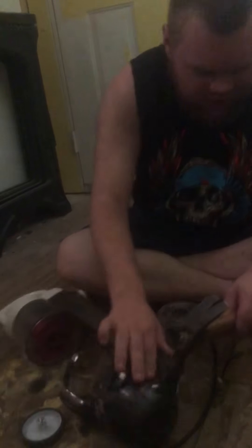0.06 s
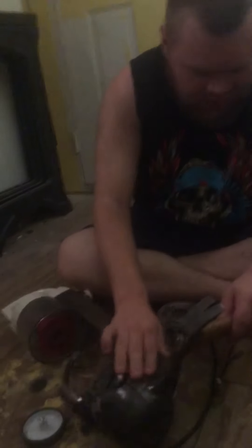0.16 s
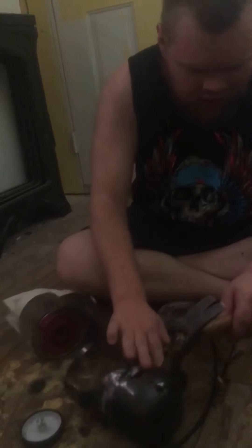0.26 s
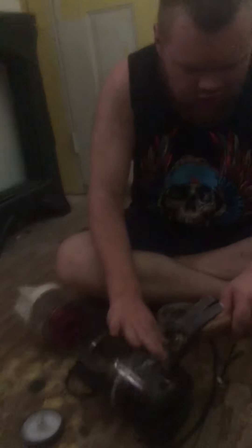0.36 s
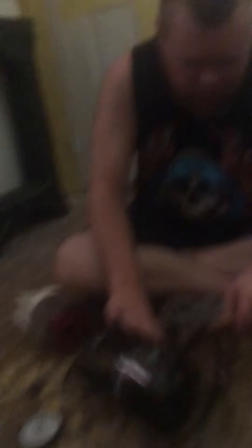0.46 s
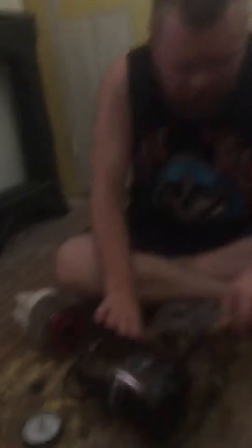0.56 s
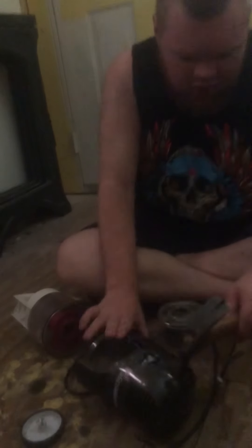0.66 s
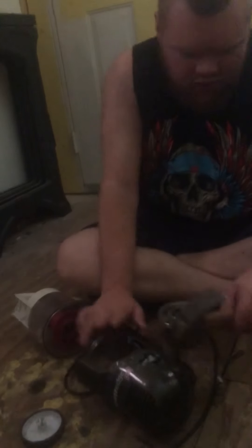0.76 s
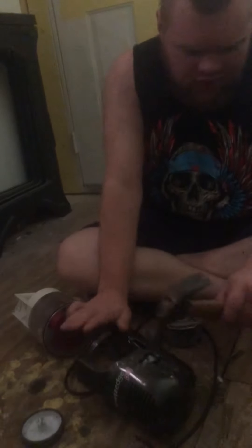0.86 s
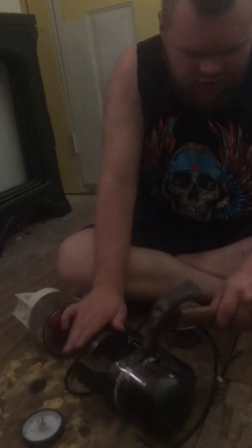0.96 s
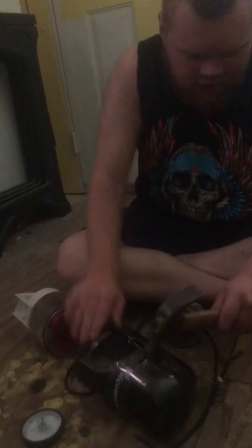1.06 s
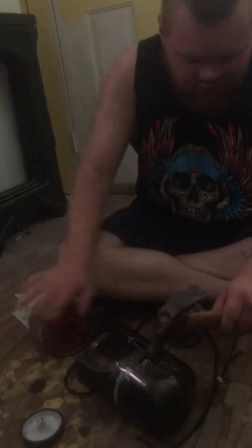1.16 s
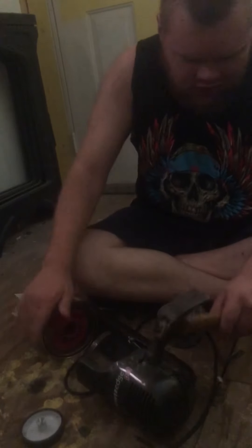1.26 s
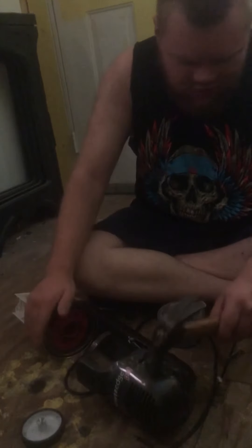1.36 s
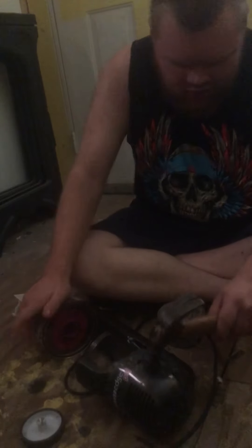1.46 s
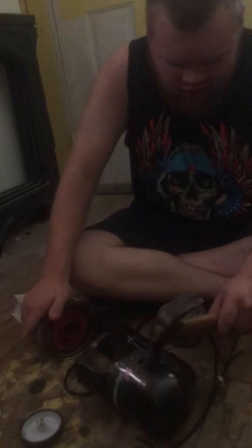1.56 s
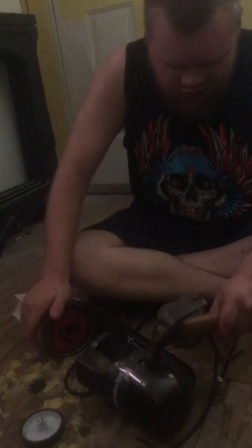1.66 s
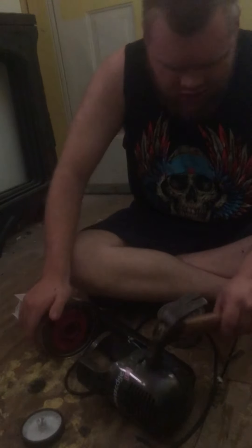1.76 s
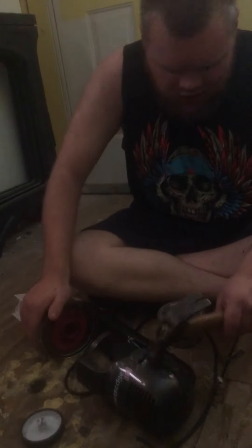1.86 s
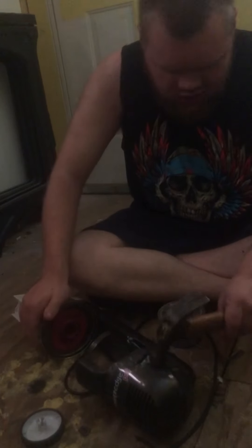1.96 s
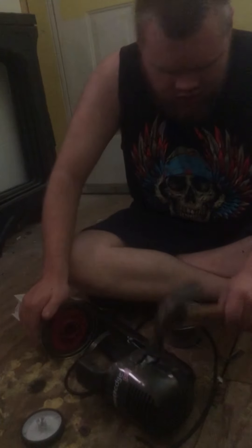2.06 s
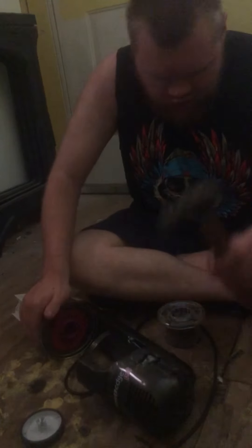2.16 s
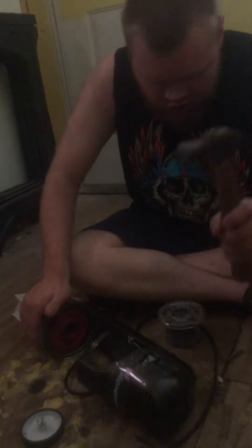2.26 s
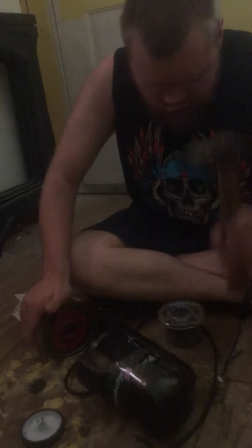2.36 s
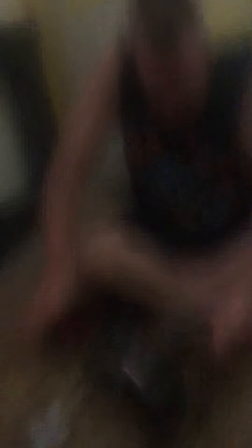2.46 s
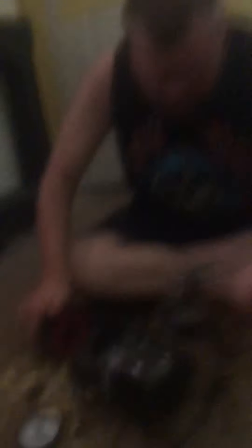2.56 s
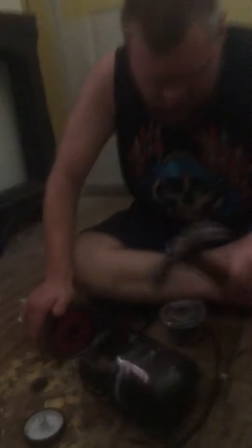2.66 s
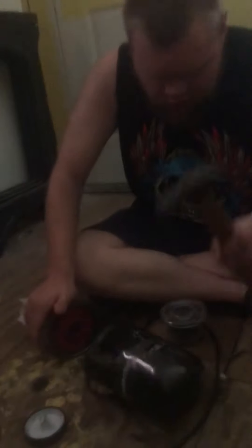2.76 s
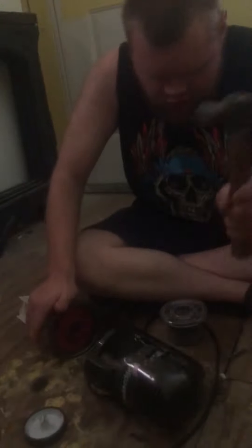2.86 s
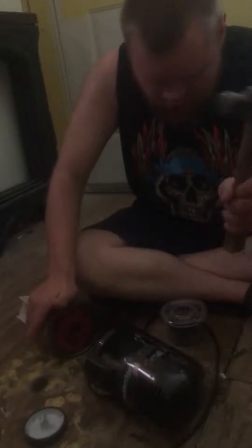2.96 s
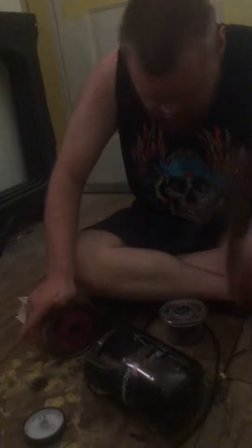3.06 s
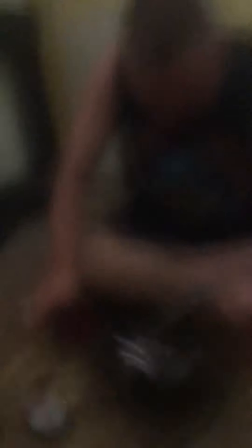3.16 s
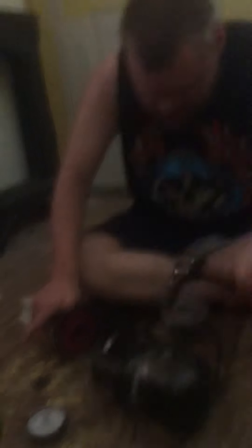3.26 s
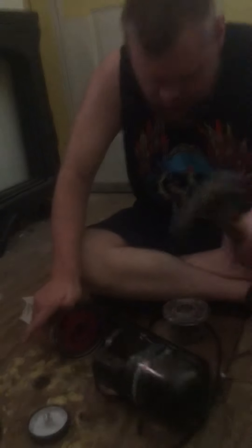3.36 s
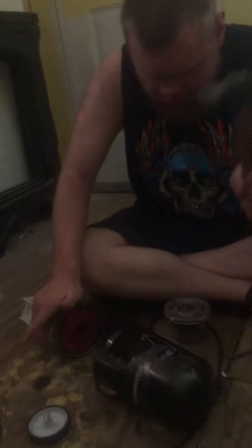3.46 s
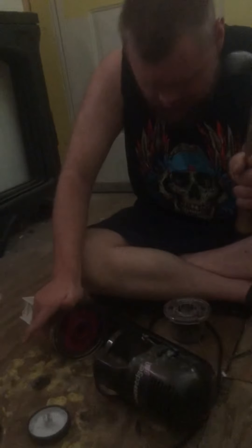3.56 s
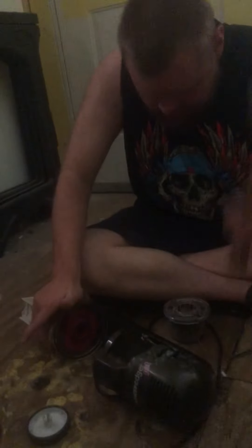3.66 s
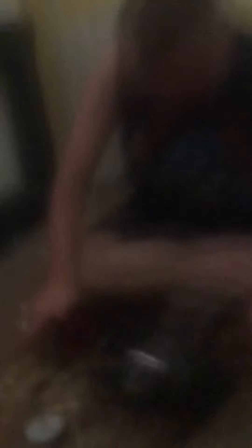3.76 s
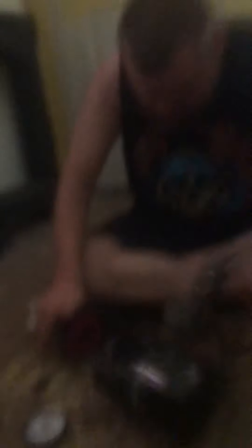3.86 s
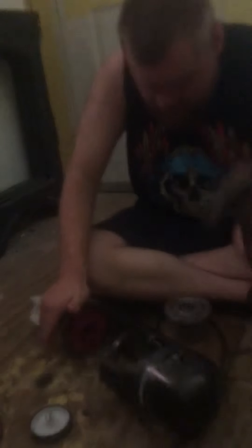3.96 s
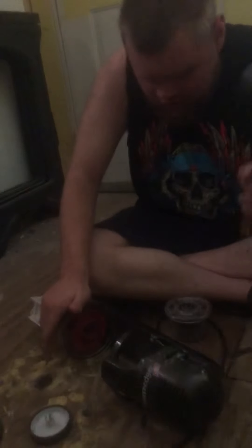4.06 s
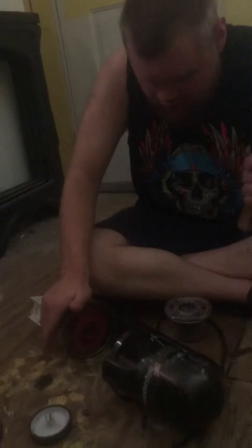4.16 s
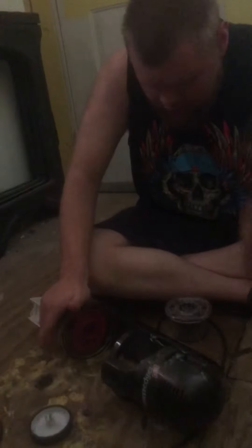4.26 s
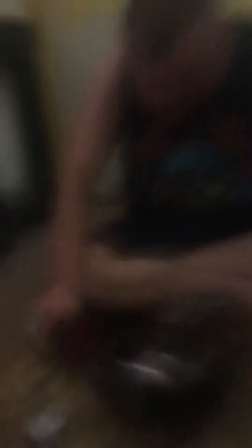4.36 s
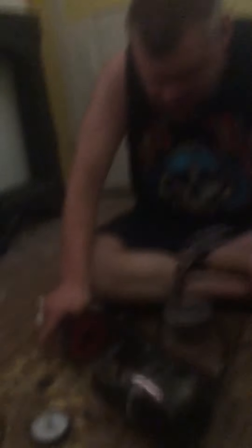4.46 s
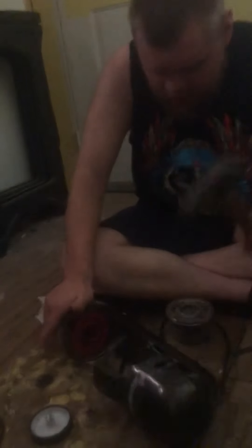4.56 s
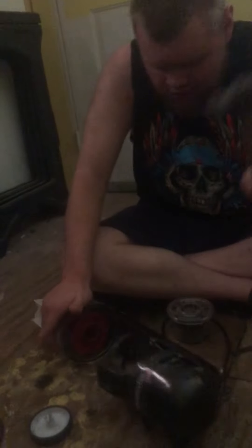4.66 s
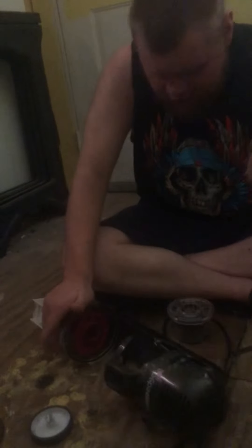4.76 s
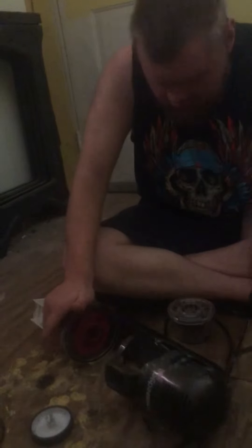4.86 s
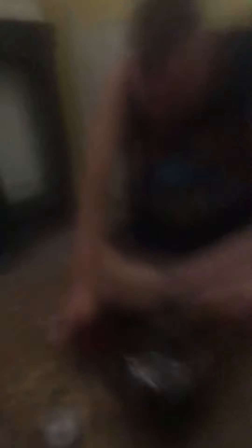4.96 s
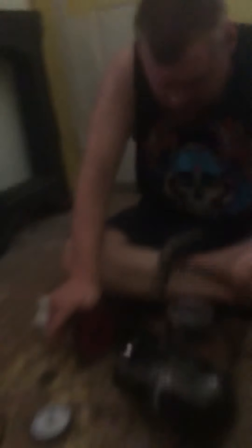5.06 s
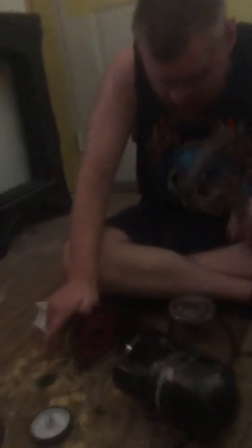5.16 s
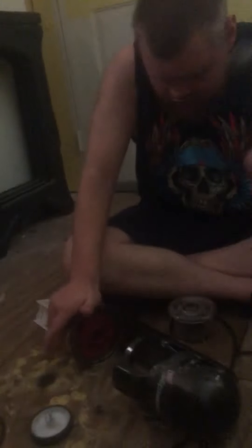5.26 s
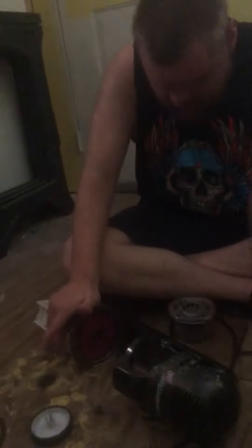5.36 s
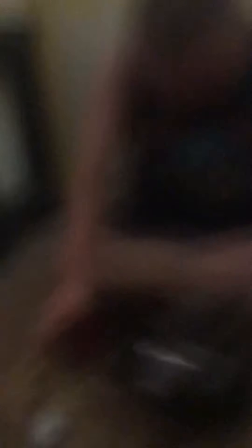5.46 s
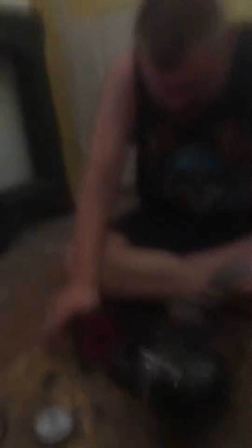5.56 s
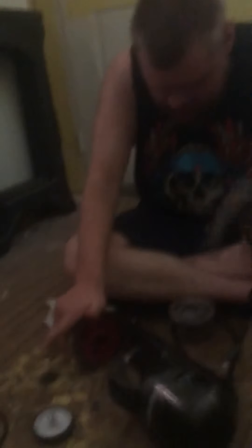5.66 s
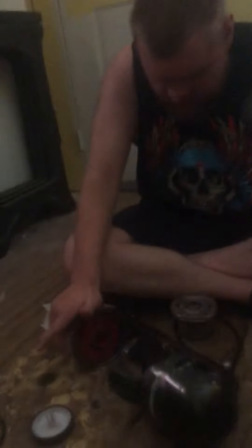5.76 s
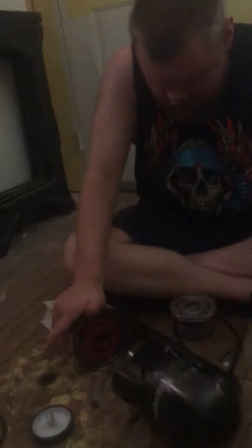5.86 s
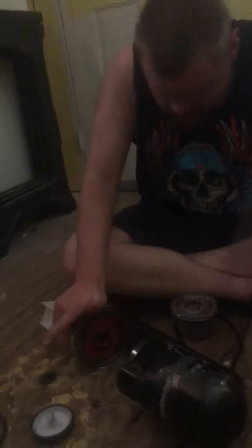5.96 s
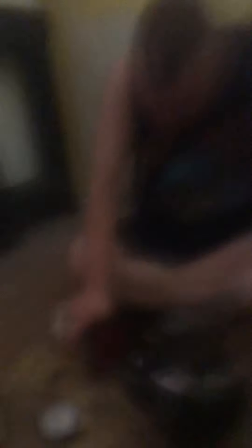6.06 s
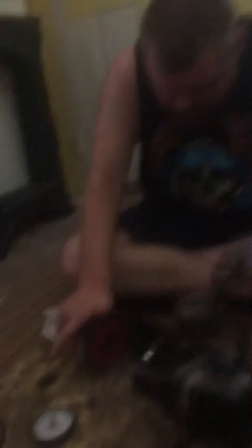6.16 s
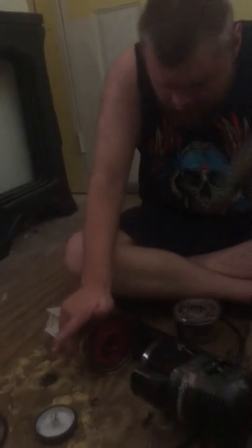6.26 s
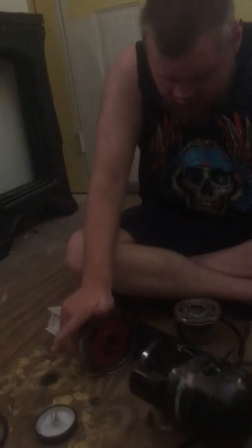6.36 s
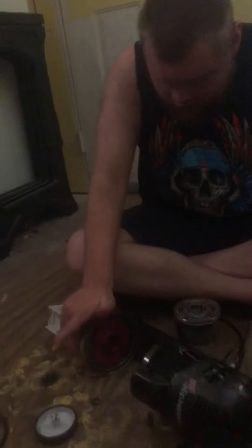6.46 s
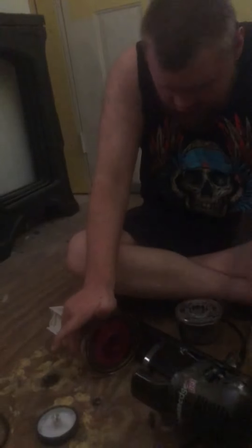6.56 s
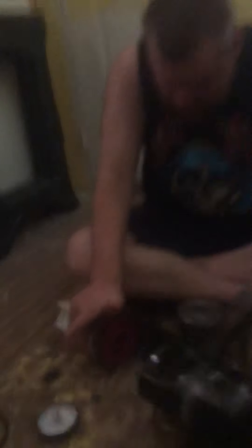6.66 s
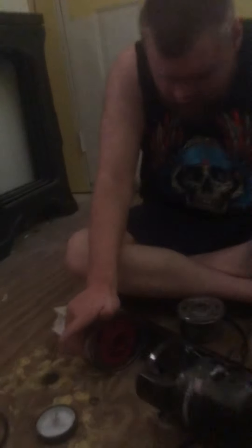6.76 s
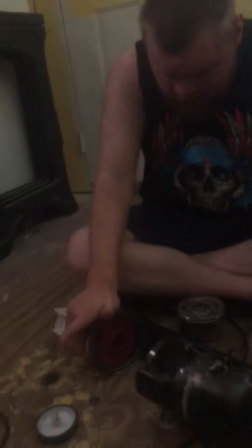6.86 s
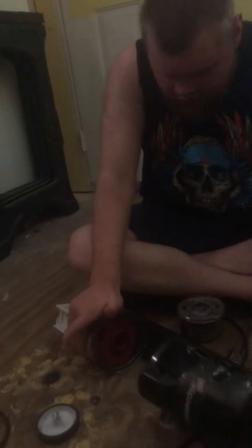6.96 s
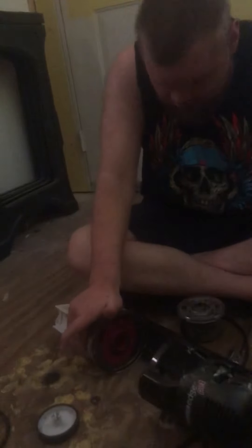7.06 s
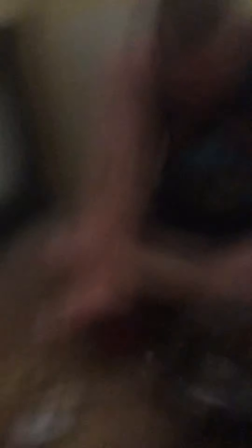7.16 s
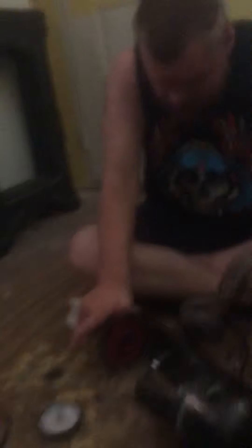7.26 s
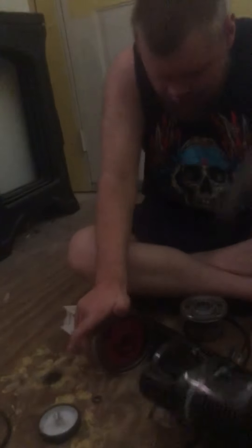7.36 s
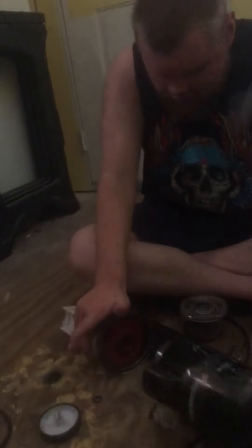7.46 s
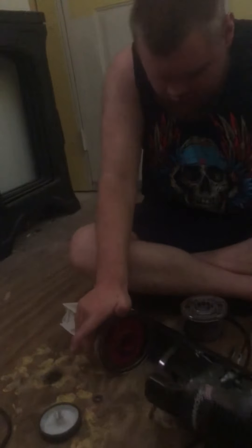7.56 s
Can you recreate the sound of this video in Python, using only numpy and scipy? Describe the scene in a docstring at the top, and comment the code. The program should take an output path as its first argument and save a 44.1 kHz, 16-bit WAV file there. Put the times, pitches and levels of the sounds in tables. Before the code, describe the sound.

A faint motor hum with a thin whirr runs throughout in a small room. During the first second, a plastic appliance is rolled over on a wooden floor, making soft, uneven thuds and a few clacks. After a lull, a hammer hits it at about 2.4 seconds and keeps going, nine loud, close blows roughly 0.6 seconds apart, the last at about 7.1 seconds. Each is a sharp plastic crack with a hollow knock, a quick rebound and a low boom in the boards, dying fast in the room. Chips and splinters tick down between blows, more noticeably from 5.5 seconds, and the housing rocks lightly, its hollow tone dropping as it splits. Small metal parts give tiny high tinkles around 6.5 and 7.5 seconds. The loosened housing scrapes briefly over grit at 7.0 seconds and again, louder, near 7.4.

```python
"""A motor hums in a small room. A plastic appliance is rolled over and bumps on the wooden floor.
From 2.4 s a hammer strikes it nine times: each blow cracks in the shell, booms in the boards and
shakes loose chips. A compressor flattens the blows; the gain control stays down after the first.
Around the last blows small metal parts tinkle and the loosened housing skids twice."""
import sys
import numpy as np
from scipy import signal
from scipy.fft import rfft, irfft, next_fast_len
from scipy.io import wavfile
from scipy.ndimage import uniform_filter1d, map_coordinates

SR = 44100
rng = np.random.default_rng(int(sys.argv[2]) if len(sys.argv) > 2 else 0)


def generate_wav(signal):
    """Clip the signal to [-1, 1] and save it as 16-bit WAV at the path in sys.argv[1]."""
    frames = np.transpose(np.atleast_2d(signal))
    scaled = np.clip(frames, -1, 1) * 32767
    pcm = np.round(scaled).astype(np.int16)
    wavfile.write(sys.argv[1], SR, pcm)


N = 334754
T = np.arange(int(.55 * SR)) / SR  # time axis of one event [s]


def amp(db):
    """Decibels to gain."""
    return 10 ** (np.asarray(db) / 20)


def unit(x):
    """Scaled to rms 1."""
    return x / np.sqrt(np.mean(x ** 2) + 1e-20)


def along(points, hz):
    """Interpolates (frequency [Hz], value) points on a log axis."""
    points_hz, values = np.transpose(points)
    return np.interp(np.log(hz + 1), np.log(points_hz), values)


def fade(t, t60_s):
    """Falls 60 dB in t60_s."""
    return np.exp(-np.log(1000) * t / t60_s)


def filtered(x, response):
    """Applies a complex frequency response."""
    size = next_fast_len(len(x) + SR // 10)
    return irfft(rfft(x, size) * response(np.fft.rfftfreq(size, 1 / SR)), size)[:len(x)]


def resonances(modes, f):
    """Response of (frequency [Hz], width [Hz], level [dB]) modes."""
    return sum(amp(db) * 1j * f * width / (hz * hz - f * f + 1j * f * width) for hz, width, db in modes)


def noise(spectrum, size):
    """Coloured noise, rms 1."""
    return unit(filtered(rng.standard_normal(size), lambda f: amp(along(spectrum, f))))


def add(track, at_s, sound):
    """Mixes a sound into a track."""
    start = round(at_s * SR)
    track[start:start + len(sound)] += sound[:max(len(track) - start, 0)]


def bend(x, lag_s, corner_hz):
    """Slow bending waves delay the lows behind the highs."""
    return filtered(x, lambda f: np.exp(-2j * np.pi * lag_s * corner_hz * np.log1p(f / corner_hz)))


# room air spectrum: (frequency [Hz], relative level [dB])
AIR_SPECTRUM = [(15, -64), (25, -20.5), (43, -1), (102, 0), (145, -5.5), (175, -2.5), (591, -14),
                (1040, -14.5), (1260, -19), (1940, -17.5), (2220, -10), (2690, -27.5), (3820, -23.5),
                (4740, -29), (16000, -46.5)]
# motor whistle bands, before squaring: (frequency [Hz], width [Hz], relative level [dB])
WHIRR_BANDS = [(1080, 19, -4.5), (1530, 58, -8.5), (1800, 21, -8), (2290, 110, -3), (2897, 77, -5.5),
               (3870, 430, -6)]
# motor tones: (frequency [Hz], relative level [dB])
HUM_TONES = [(118.4, -50.5), (1023, -55.5), (1593, -59), (2051, -60), (2143, -57), (3876, -63.5)]
def background():
    """Room air and a small motor with slightly unsteady tones."""
    t = np.arange(N) / SR
    whirr = unit(filtered(rng.standard_normal(N), lambda f: np.abs(resonances(WHIRR_BANDS, f)) ** 2))
    hum = np.zeros(N)
    drift_hz = 4.6
    for hz, db in HUM_TONES:
        drift_rad = .49 * map_coordinates(rng.standard_normal(int(N * drift_hz / SR) + 4), [t * drift_hz])
        hum += amp(db) * np.sqrt(2) * np.sin(2 * np.pi * hz * t + drift_rad)
    return amp(-43) * noise(AIR_SPECTRUM, N) + amp(-57) * whirr + amp(-.5) * hum


# room decay: (frequency [Hz], t60 [s])
ROOM_DECAY = [(60, 0.74), (160, 0.21), (420, 0.37), (1100, 0.35), (3000, 0.33), (7500, 0.3), (14000, 0.23)]
def reverberation(spectrum, near_db=-9, walls_s=.02):
    """Weak nearby echoes, then the walls' full answer, dying band by band; energy 1."""
    hz, t, bands = signal.stft(noise(spectrum, len(T)), SR, nperseg=256)
    bands = bands * fade(t, along(ROOM_DECAY, hz)[:, None])
    tail = signal.istft(bands, SR, nperseg=256)[1][:len(T)]
    early_db = near_db * np.clip((walls_s - T) / .0037, 0, 1)
    tail = tail * amp(early_db) * np.minimum(T / .00079, 1)
    return tail / np.linalg.norm(tail)


def contact(spectrum, t60_s, attack_s, wet_db):
    """Dense modes swell and die; the room answers in the same colour."""
    envelope = fade(T, t60_s) * (1 - np.exp(-T / attack_s))
    room = amp(wet_db) * np.linalg.norm(envelope) * reverberation(spectrum)
    return noise(spectrum, len(T)) * envelope + room


# plastic clack, hollow knock and floor boom spectra: (frequency [Hz], relative level [dB])
CLACK_SPECTRUM = [(60, -38), (300, 5), (600, 0.5), (1100, 0.5), (2200, -4), (4500, -10.5), (8000, -21),
                  (16000, -40)]
KNOCK_SPECTRUM = [(60, -34), (130, -10.5), (170, -3), (210, -7.5), (250, -0.5), (330, -2), (420, -8.5),
                  (700, -16), (2500, -72.5)]
BOOM_SPECTRUM = [(15, -33.5), (28, -32.5), (40, -6.5), (52, -14), (68, 2.5), (90, -2.5), (125, -14),
                 (200, -12), (600, -59)]
def bump(boom_db, knock_db, clack_db):
    """One touch of the housing on the boards."""
    clack = amp(clack_db + .5) * contact(CLACK_SPECTRUM, t60_s=.052, attack_s=.00044, wet_db=-2)
    knock = amp(knock_db) * contact(KNOCK_SPECTRUM, t60_s=.08, attack_s=.0035, wet_db=-2.5)
    boom = amp(boom_db) * contact(BOOM_SPECTRUM, t60_s=.17, attack_s=.012, wet_db=-4)
    return bend(clack + knock + boom, lag_s=.02016, corner_hz=87)


def handling(count=6, span_s=.8, level_db=-35):
    """Soft, uneven thuds as a hand rolls the housing over."""
    track = np.zeros(N)
    for at_s in np.linspace(0, span_s, count):
        thud_s = abs(at_s + rng.normal(0, .007))
        gain = amp(level_db + rng.normal(0, 1))
        add(track, thud_s, gain * bump(boom_db=3, knock_db=-9, clack_db=-8.5))
    return track


# housing bumps, relative levels: (time [s], boom [dB], knock [dB], clack [dB])
HOUSING_BUMPS = [(.39, -15.5, -14, -12), (.475, -17, -19.5, -20), (.499, -16, -36, -46),
                 (2.688, -27, -22.5, -42), (5.22, -27, -42, -30), (5.756, -17, -23, -35.5),
                 (6.442, -28, -37, -33), (7.414, -33, -25, -47)]
def rocking(touches=2, gap_s=.11, loss_db=18):
    """The housing tips and settles on the boards, each touch weaker and duller."""
    track = np.zeros(N)
    for at_s, boom_db, knock_db, clack_db in HOUSING_BUMPS:
        for touch in range(touches):
            delay_s = touch * gap_s * rng.uniform(.8, 1.2)
            thud = bump(boom_db, knock_db, clack_db - 8 * touch)
            add(track, at_s + delay_s, amp(-loss_db * touch) * thud)
    return track


# chip tick and body spectra: (frequency [Hz], relative level [dB])
TICK_SPECTRUM = [(500, -41), (2500, -2), (6000, 5.5), (8000, 4), (11000, -1), (16000, -3)]
BODY_SPECTRUM = [(200, -3.5), (900, -3.5), (2500, -3.5), (4500, -5), (9000, -37)]
# larger chips landing: (time [s], relative level [dB], body re tick [dB])
CHIP_LANDINGS = [(.512, -39.5, -15), (1.549, -54.5, 2), (3.411, -40.5, -11), (4.508, -32.5, -7),
                 (4.728, -52, 4.5), (5.17, -37.5, -8), (5.629, -27.5, -14), (5.659, -31, -23),
                 (5.847, -40, -5), (5.885, -39.5, -9), (6.334, -37.5, 0.5), (6.456, -41, -0.5),
                 (6.467, -38, -4), (7.339, -29, -17), (7.456, -33, -8), (7.55, -46, 6)]
def chips():
    """Chips and loose parts tick against the shell and the floor."""
    track = np.zeros(N)
    for at_s, db, body_db in CHIP_LANDINGS:
        tick = contact(TICK_SPECTRUM, t60_s=.019, attack_s=.00017, wet_db=-5)
        body = amp(body_db) * contact(BODY_SPECTRUM, t60_s=.042, attack_s=.00073, wet_db=.5)
        add(track, at_s, amp(db + 10.5) * (tick + body))
    return track


# shell crack spectrum: (frequency [Hz], relative level [dB])
SHELL_SPECTRUM = [(30, -39), (150, -15), (400, -1), (1200, -1.5), (1900, -1), (3000, -3), (5000, -4),
                  (7500, -6), (10000, -9.5), (13000, -14), (16000, -8.5)]
# housing modes: (frequency [Hz], width [Hz], level [dB])
HOUSING_MODES = [(167.3, 5.8, -6), (246, 15, -7.5), (315, 26, -5), (520, 33, -7), (583, 24, -14),
                 (690, 6.6, -13), (780, 19, -9), (889, 20, 0), (960, 16, -22), (1113, 19, 0),
                 (1222, 54, -0.5), (1302, 40, -3), (1450, 32, -19), (2653, 46, -2.5), (2740, 17, -15.5)]
# cavity ring, dropping as the shell splits: (time [s], frequency [Hz])
CAVITY_PITCH = [(3.15, 300), (3.7, 243), (5.5, 240), (6.0, 175)]
# blows, relative levels: (time [s], force [dB], boom [dB], knock [dB], crack [dB], panel ring [Hz])
HAMMER_BLOWS = [(2.44, -9, -0.5, 5, 6, 1150), (3.102, -7, 0.5, 4.5, 3, 1146),
                (3.7337, -5, -0.5, 3, -1, 1292), (4.3163, -6, -2.5, -1.5, 4.5, 1150),
                (4.9124, -4.5, -0.5, 1.5, 2, 865), (5.4641, -2, -5, -2.5, -1.5, 662),
                (6.0192, -5, -2.5, 4, 5.5, 935), (6.576, -6, -3.5, 0, 3.5, 2880),
                (7.1301, -3, -4, -3.5, -1, 970)]
def hammer(rebound_db=-11.5):
    """Each blow cracks on the shell, rings its panels and drives it into the floor, where it rebounds."""
    track = np.zeros(N)
    for at_s, force_db, boom_db, knock_db, crack_db, panel_hz in HAMMER_BLOWS:
        cavity_hz = np.interp(at_s, *np.transpose(CAVITY_PITCH))
        rebound_s = .049 * rng.uniform(.9, 1.1)
        crack = contact(SHELL_SPECTRUM, t60_s=.023, attack_s=.00041, wet_db=2)
        crack += amp(.5 * crack_db - 7) * crush()
        rebound_crack = contact(SHELL_SPECTRUM, t60_s=.073, attack_s=.0043, wet_db=3.5)
        add(crack, rebound_s, amp(rebound_db) * rebound_crack)
        blow = filtered(crack, lambda f: amp(crack_db * f ** 2 / (f ** 2 + 4500 ** 2)))  # treble shelf

        hollow = [(hz * (cavity_hz / 275) ** .099, db) for hz, db in KNOCK_SPECTRUM]
        knock = amp(knock_db - 13) * contact(hollow, t60_s=.083, attack_s=.011, wet_db=5.5)
        thud = contact(BOOM_SPECTRUM, t60_s=.12, attack_s=.0014, wet_db=-.5)
        boom = amp(boom_db - 11) * (thud + amp(-2) * floorboards())
        add(blow, .006, knock + boom)  # the housing meets the floor just after the hit
        rebound_knock = contact(hollow, t60_s=.069, attack_s=.0077, wet_db=-2)
        add(blow, rebound_s, amp(knock_db + rebound_db + 4) * rebound_knock)

        panel = [(panel_hz, 26, 4), (panel_hz, 500, -9)]  # one sharp mode in a broad cluster
        modes = list(HOUSING_MODES) + panel + [(cavity_hz, 32, 0)]
        blow = filtered(blow, lambda f: 1 + resonances(modes, f) + shell_walls(f))
        add(track, at_s, amp(force_db + 11) * bend(blow, lag_s=.026, corner_hz=143.2))
    return track


def crush(length_s=.008):
    """A dense run of tiny fractures that stops with the hammer head."""
    fractures = rng.standard_normal(len(T)) ** 3 * fade(np.maximum(T - length_s, 0), t60_s=.0035)
    burst = filtered(fractures, lambda f: amp(along(SHELL_SPECTRUM, f)))
    return burst / np.sqrt(np.sum(burst ** 2) / (length_s * SR))


def shell_walls(f, count=12, range_hz=(401.8, 3773), q=28.5, level_db=-3.5):
    """Each spot on the shell favours some wall modes and cancels others."""
    modes = [(hz, hz / q, level_db) for hz in np.exp(rng.uniform(*np.log(range_hz), count))]
    return resonances(modes[::2], f) - resonances(modes[1::2], f)


# floorboard modes: (frequency [Hz], relative level [dB], t60 [s])
FLOOR_MODES = [(38.6, -4.5, 0.34), (68.7, 0, 0.31), (98.6, 2, 0.2), (129, -5, 0.26), (166.8, -9, 0.22)]
def floorboards(attack_s=.0013):
    """A push sets the boards swinging, at slightly new strengths each time."""
    swing = sum(amp(db + rng.normal(0, .77)) * np.sin(2 * np.pi * hz * T) * fade(T, t60_s)
                for hz, db, t60_s in FLOOR_MODES)
    return swing * (1 - np.exp(-T / attack_s))


def splinters(count=14, db_per_force_db=2.4, fall_db_per_s=35):
    """Splinters rain down after each blow, louder after a hard one, thinning and weakening."""
    track = np.zeros(N)
    for at_s, force_db, *_ in HAMMER_BLOWS:
        flight_s = .15 + np.minimum(rng.exponential(.057, count), .28)
        landing_db = rng.normal(0, 7, count) - fall_db_per_s * (flight_s - .2642)
        landings = np.zeros(len(T))
        landings[(flight_s * SR).astype(int)] = amp(landing_db)
        tick = contact(TICK_SPECTRUM, t60_s=.015, attack_s=.0003, wet_db=-2)
        body = amp(-5.5) * contact(BODY_SPECTRUM, t60_s=.016, attack_s=.00045, wet_db=5.5)
        rattle = signal.fftconvolve(landings, tick + body)
        add(track, at_s, amp(db_per_force_db * force_db - 30) * rattle)
    return track


# metal parts ringing: (time [s], frequency [Hz], level [dB])
METAL_PINGS = [(6.455, 5900, -30), (6.467, 10700, -28), (7.45, 15440, -22), (7.455, 11300, -20.5)]
def tinkles():
    """Small metal parts ping with a wavering phase and a faint after-ring."""
    track = np.zeros(N)
    envelope = fade(T, t60_s=.029) + amp(-21) * fade(T, t60_s=.22)
    for at_s, hz, db in METAL_PINGS:
        waver_rad = .14 * np.cumsum(rng.standard_normal(len(T)))
        add(track, at_s, amp(db) * np.sin(2 * np.pi * hz * T + waver_rad) * envelope)
    return track


# housing skids: (time [s], relative level [dB])
HOUSING_SKIDS = [(6.998, -35.5), (7.352, -23)]
def skids():
    """The loosened housing scrapes a short way over grit on the boards."""
    track = np.zeros(N)
    for at_s, db in HOUSING_SKIDS:
        hiss = contact(TICK_SPECTRUM, t60_s=.14, attack_s=.003, wet_db=5.5)
        body = amp(-1) * contact(BODY_SPECTRUM, t60_s=.21, attack_s=.003, wet_db=-3)
        grit_db = 2.5 * unit(uniform_filter1d(rng.standard_normal(len(T)), size=90))
        add(track, at_s, amp(db + grit_db) * (hiss + body))
    return track


def scene():
    """All sources at one microphone."""
    blows = hammer() + splinters()
    return (blows + rocking() + handling() + chips() + tinkles() + skids() + background())[None]


def overshoot(x, window_s, limit_db, recovery_s):
    """Held level above a limit [dB]; the hold sinks 10 dB in recovery_s."""
    power = np.abs(uniform_filter1d(x ** 2, max(int(window_s * SR), 2)))
    sink_db = 10 * np.arange(N) / SR / recovery_s
    held_db = np.maximum.accumulate(10 * np.log10(power + 1e-12) + sink_db) - sink_db
    return np.maximum(held_db - limit_db, 0)


def follow(x, lag_s):
    """One-pole smoothing."""
    pole = np.exp(-1 / (lag_s * SR))
    return signal.lfilter([1 - pole], [1, -pole], x)


def record(dry, bass_hz=22, react_s=.005, top_hz=15800):
    """Bass cut, slow gain control, peak limiter, late-acting compressor, soft clip, band limit."""
    x = filtered(dry[0], lambda f: (1j * f / (1j * f + bass_hz)) ** 2)
    slow_db = overshoot(x, window_s=.003, limit_db=-9, recovery_s=20)
    x = x * amp(-np.minimum(slow_db, 9))
    limiter_db = overshoot(x, window_s=.0018, limit_db=-12.5, recovery_s=.017)
    excess_db = overshoot(x, window_s=.0017, limit_db=-13.5, recovery_s=.031)
    compressor_db = .23 * np.roll(follow(excess_db, lag_s=.00049), round(react_s * SR))
    x = x * amp(-np.maximum(limiter_db, compressor_db))
    x = x / (1 + np.abs(x / .85) ** 4) ** (1 / 4)
    return filtered(x, lambda f: 1 / np.sqrt(1 + np.minimum(f / top_hz, 1.2) ** 300))[None]


dry = scene()
out = record(dry)
generate_wav(out)
```